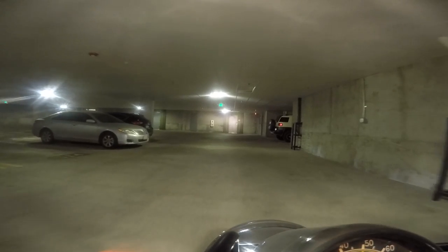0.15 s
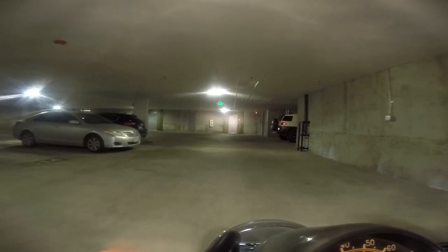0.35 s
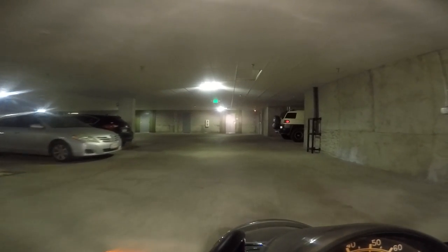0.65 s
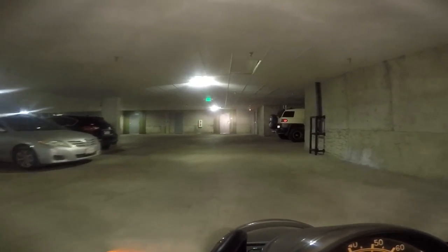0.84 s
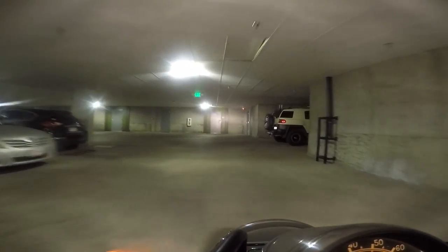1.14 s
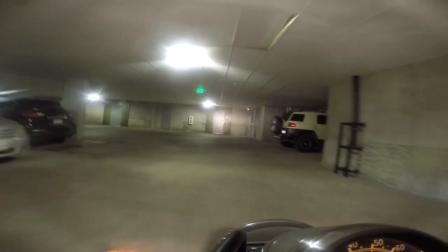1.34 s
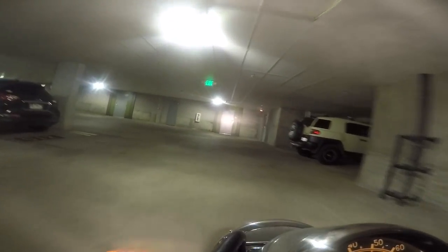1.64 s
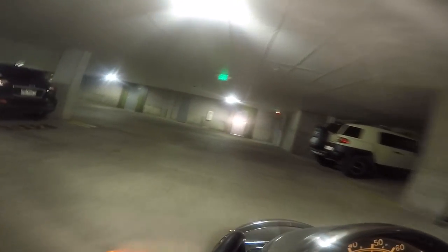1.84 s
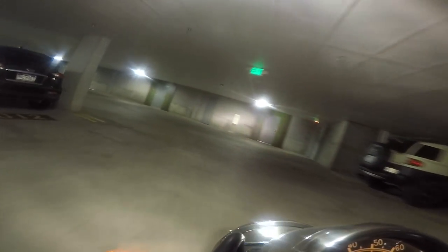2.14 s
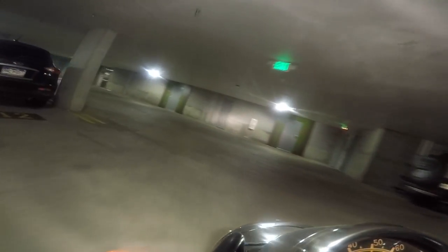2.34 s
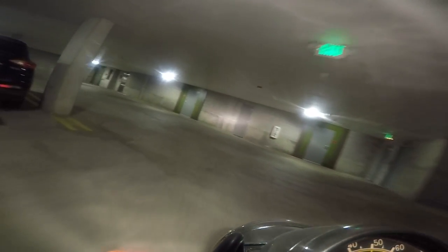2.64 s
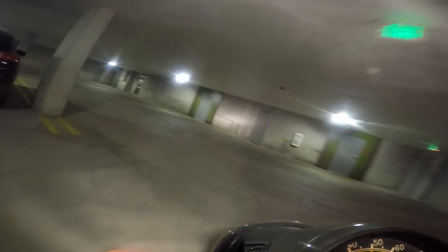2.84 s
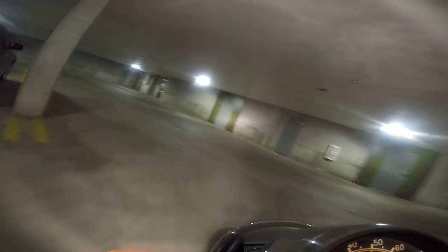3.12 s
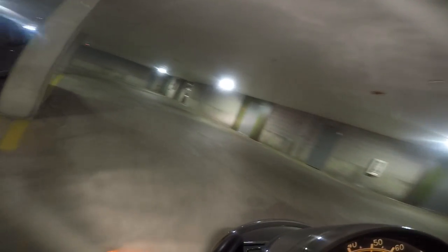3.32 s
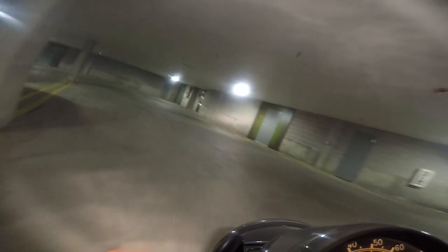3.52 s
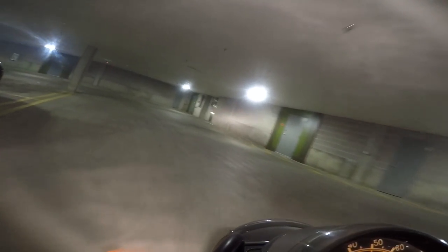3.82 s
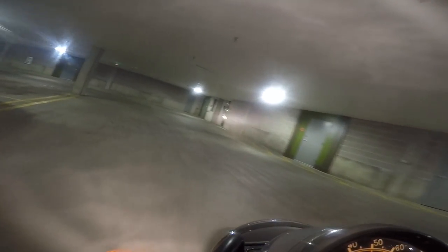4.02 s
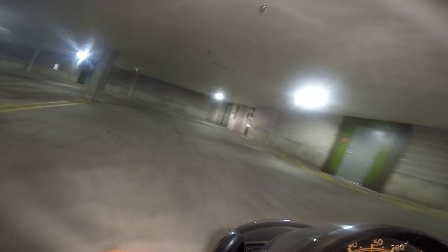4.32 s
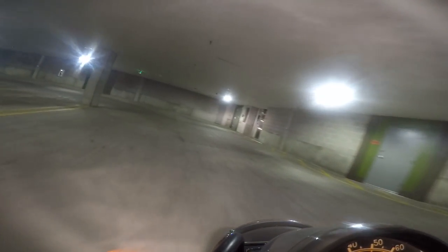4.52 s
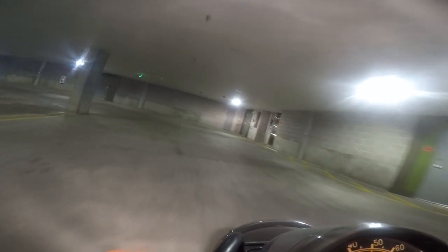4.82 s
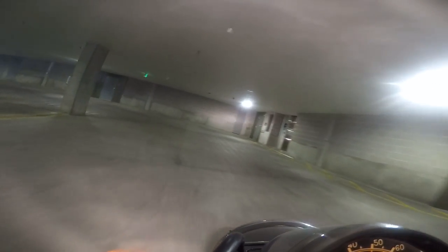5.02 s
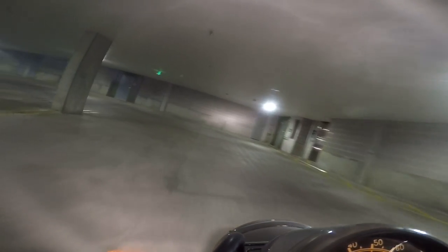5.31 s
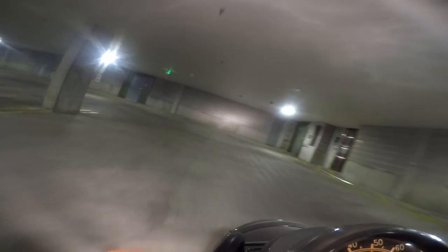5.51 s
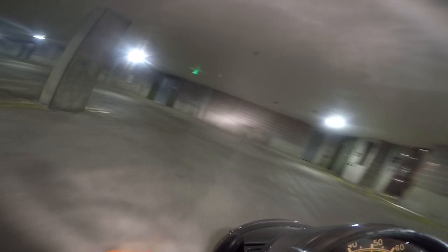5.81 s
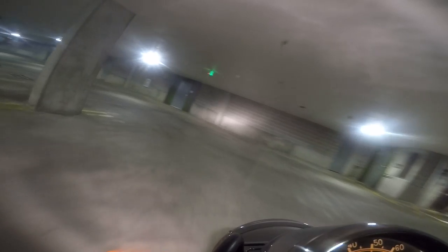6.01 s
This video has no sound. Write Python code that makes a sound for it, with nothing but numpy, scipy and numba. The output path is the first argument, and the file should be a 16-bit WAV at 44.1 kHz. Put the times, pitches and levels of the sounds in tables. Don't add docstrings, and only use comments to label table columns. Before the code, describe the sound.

A heavy, buzzing engine drone fills a reverberant underground garage as a motorcycle creeps along. Sharp plastic ticks and dull case thumps strike at once and return in uneven clusters, easing somewhat after four seconds. Gear whine grows clearer near five seconds, with two tiny chirps late on. The microphone is fixed to the vibrating bike, close, slightly overloaded and pumping.

```python
import sys
import numpy as np
from scipy import signal
from scipy.fft import rfft, irfft
from scipy.io import wavfile
from scipy.ndimage import uniform_filter1d
from numba import njit

SR = 44100
rng = np.random.default_rng(int(sys.argv[2]) if len(sys.argv) > 2 else 0)


def master_out(mix):
    frames = np.transpose(np.atleast_2d(mix))
    ceiling = np.clip(frames, -1, 1)
    pcm = np.round(ceiling * 32767).astype(np.int16)
    wavfile.write(sys.argv[1], SR, pcm)


def boost_factor(decibels):
    exponent = np.asarray(decibels, float) / 20
    return 10 ** exponent


N = 271656

# t/s, level/dB
SQUEAKS = [
    (4.955, -38.5),
    (4.967, -37),
    (5.829, -38),
    (5.834, -37),
]
# start t/s, end t/s, level/dB
GEAR_LOAD = [(-.1, .6, -39), (.6, .9, -41), (1.2, 1.55, -43), (4.55, 4.8, -40), (4.8, 5.14, -35),
             (5.14, 5.24, -39), (5.24, 5.78, -35), (5.78, 5.9, -41), (5.9, 6.3, -39.5)]
# f/Hz, level/dB
CLATTER_COLOUR = [(120, -28.5), (200, -16.5), (332, -13), (500, -7), (640, -15.5), (889, -15.5),
                  (1140, -14), (1320, -22.5), (2090, -27.5), (3140, -34.5), (5950, -37), (8900, -47.5),
                  (10600, -58.5), (15000, -71)]
# t/s, level/dB
CLATTER_LOAD = [(0.0, -45), (0.809, -45), (1.11, -43.5), (2.2, -42.5), (2.33, -43.5), (3.12, -43.5),
                (3.33, -45), (4.6, -44), (5.08, -42.5), (5.59, -44), (6.16, -41.5)]
# t/s, tick level/dB, blow level/dB
KNOCKS = [(.0095, -28.5, -11), (0.2975, -28.5, -10.5), (1.3806, -30.5, -11.5), (1.595, -28.5, -12),
          (1.8783, -28.5, -12.5), (1.909, -30.5, -11), (2.0603, -33, -12.5), (2.204, -29.5, -13.5),
          (2.31, -30.5, -10.5), (2.3277, -28.5, -9), (2.4126, -25.5, -8), (2.7847, -31.5, -17),
          (2.7917, -29, -11), (2.9073, -27.5, -9), (3.279, -34, -14), (3.332, -25, -10),
          (3.3443, -33.5, -12.5), (3.4238, -30.5, -12.5), (3.4663, -29.5, -10.5), (3.8543, -26, -10),
          (3.9483, -30, -13), (4.0596, -29, -12), (4.1413, -32.5, -14.5), (4.1931, -29.5, -10),
          (4.2232, -27, -9.5), (5.0311, -32.5, -14.5), (5.5518, -25.5, -8.5), (5.8795, -28.5, -11.5),
          (5.9488, -30, -13), (6.146, -24, -8.5)]
# t/s, tick level/dB, blow level/dB
TAPS = [(0.0316, -38.5, -15.5), (.0978, -39.5, -14.5), (0.1204, -39, -17.5), (0.3851, -33.5, -13),
        (0.5599, -39.5, -18.5), (.646, -39, -16), (1.1228, -34, -14), (1.3127, -35, -16.5),
        (2.2145, -33, -10.5), (2.2426, -32, -12), (2.2856, -31.5, -15.5), (2.2974, -33.5, -15),
        (2.3952, -32.5, -11.5), (2.5172, -34, -13.5), (2.8038, -34, -12.5), (3.177, -32, -16.5),
        (3.4956, -33, -13), (3.5093, -29.5, -10.5), (4.2845, -37, -15.5), (4.466, -34.5, -15.5),
        (4.63, -35.5, -14.5), (4.7095, -35, -15), (5.0948, -35.5, -15), (5.1114, -34, -16),
        (5.1347, -37, -13.5), (5.2329, -39, -14.5), (5.433, -38, -14), (5.5338, -35.5, -17.5),
        (5.6305, -35.5, -13), (6.0269, -37, -13)]
# start t/s, end t/s, tick level/dB
ROUGH_FLOOR = [(.04, .06, -41.5), (.2, .37, -49), (1.28, 1.3, -47), (1.64, 1.71, -42), (1.715, 1.75, -34.5),
               (1.79, 1.82, -35), (1.86, 1.875, -39.5), (1.94, 2.025, -37.5), (2.07, 2.19, -52),
               (2.417, 2.43, -39.5), (2.46, 2.71, -39.5), (2.86, 3.08, -39.5), (3.13, 3.2, -35.5),
               (3.23, 3.42, -42), (3.52, 3.535, -32), (3.57, 3.655, -37.5), (3.95, 3.99, -39.5),
               (4.2, 4.215, -31), (4.32, 4.45, -47.5), (4.715, 4.73, -37.5), (4.78, 4.8, -39),
               (5.01, 5.02, -43), (5.2, 5.225, -40.5), (5.6, 5.66, -42.5), (5.84, 6.14, -45.5)]
# place in the cycle [0-1], level/dB
SWINGS = [
    (.11, -1),
    (.39, -4),
    (.67, 1),
]
# f/Hz, t60/s, level/dB, crest delay/s
CASE_MODES = [(117.2, 0.03, -1.5, 0.0044), (162.7, 0.089, -9, 0.0036), (256.5, 0.032, -3, 0.0024),
              (405, 0.013, -1.5, 0.0024), (773, 0.019, -9.5, .0013), (878.4, 0.042, -6.5, .0012),
              (2045, 0.019, -9, 0.0006)]
# f/Hz, t60/s, level/dB, crest delay/s
TICK_MODES = [(2694, 0.028, -5, 0.00037), (3636, 0.029, -5.5, 0.00031), (4750, 0.0029, -6, 0.00033),
              (5640, 0.023, -3.5, 0.0023), (5980, 0.019, 1.5, .0003), (7600, 0.012, -4, 0.000077),
              (8750, 0.011, -7, 0.00018), (10344, 0.0036, -24, .0004), (12300, .003, -26, .0004),
              (14500, .003, -28, .0004)]
# f/Hz, width/Hz, level/dB
PIPE_MODES = [(174.3, 122, 3), (341, 45, 0.5), (464.4, 175, -2), (506.05, 101, -2), (885, 270, -16),
              (1137, 135, -12), (1582, 120, -21.5), (2132, 53, -20.5)]
# t/s, cycle rate f/Hz
SPEED = [(0, 22.742), (1.3, 23.273), (1.6, 23.544), (2.6, 24.214), (3.3, 24.218), (4.7, 24.691),
         (6.16, 25.431)]
# place in the cycle [0-1], level/dB
BEATS = [
    (.13, -1.5),
    (.42, -5.5),
    (.67, -4),
    (0.923, -5),
]
# multiple of the cycle rate, sign, start level/dB, end level/dB
STRONG_ORDERS = [(2, -1, -16.5, -15), (3, -1, -19.5, -15.5), (4, 1, -18.5, -27.5), (5, -1, -17, -14),
                 (7, -1, -19, -19)]
# multiple of the cycle rate, level/dB
WEAK_ORDERS = [(2.5, -29), (3.5, -25.5), (6, -27.5), (6.5, -33.5), (7.5, -31.5), (8, -34), (9, -31),
               (10, -37.5), (12, -33.5), (14, -35)]
# t/s, order, level change/dB, length/s
ORDER_DIPS = [(.35, 2, 0.5, 0.07), (0.694, 2, -0.5, .1), (2.394, 2, 0, .15), (3.643, 2, -4.5, .15),
              (4.152, 2, 2, 0.12), (5.847, 2, -3.5, .12), (.5, 3, -7, 0.17), (2.043, 3, -3, 0.27),
              (2.81, 3, -5, 0.071), (3.75, 3, -3, .15), (4.247, 3, -3.5, 0.068), (4.756, 3, -5.5, .1),
              (5.248, 3, -6, 0.091), (5.847, 3, -8.5, .12), (2.084, 4, -12.5, .1), (4.221, 4, -8.5, 0.11),
              (0.297, 5, -1, 0.44), (1.703, 5, -18, 0.21), (2.997, 5, -14, 0.12), (3.504, 5, -9.5, .2),
              (4.195, 5, -12, 0.15), (4.832, 5, -8.5, 0.11), (5.6, 5, -3.5, 0.097), (.9, 7, -17.5, 0.47),
              (1.485, 7, -7.5, .08), (2.398, 7, -7.5, 0.039), (2.773, 7, -17.5, 0.066),
              (3.889, 7, -7.5, .35), (4.92, 7, -3.5, 0.12), (5.518, 7, -10.5, 0.11)]

START_TURNS = .884
GARAGE_T60_S = 2.67
TEETH = 46.2
WHINE_SLACK_DB, WHINE_FADE_S = -56, .08
CHATTER_DB, CHATTER_SCATTER_DB, RATTLE_SCATTER_DB, SWING_JITTER_S = -58, 3.5, 1.5, .0008
BLOW_DB, BLOW_PER_TICK, BLOW_SCATTER_DB = -13, 0.79, 2
TICK_LAG_S = .0004
DUCK_ATTACK_S, DUCK_RELEASE_S, DUCK_FROM, DUCK_SHARE = 0.0009, 0.054, .55, 0.66
TOP_HZ = 15300


def level(x, db):
    return x * boost_factor(db) / np.sqrt(np.mean(x ** 2))


def curve(s, values):
    return np.interp(np.arange(N) / SR, s, values)


def walk(rate):
    hold = int(SR / rate)
    steps = np.repeat(rng.standard_normal(N // hold + 1), hold)
    return 1.2 * uniform_filter1d(uniform_filter1d(steps, hold), hold)[:N]


def band(x, hz, width):
    return signal.lfilter(*signal.iirpeak(hz, hz / width, fs=SR), x)


def ring(x, modes):
    t = np.arange(int(.08 * SR)) / SR
    response = 0
    for hz, t60, db, crest in modes:
        rise = np.sin(np.pi / 2 * np.clip((t + 0.0012) / (crest + 0.0013), 0, 1)) ** 2
        decay = np.exp(-np.log(1000) * np.maximum(t - crest, 0) / t60)
        response = response + boost_factor(db) * rise * decay * np.cos(2 * np.pi * hz * (t - crest))
    return signal.oaconvolve(x, response)[:N]


def rumble():
    sway = signal.sosfilt(signal.butter(2, 30, fs=SR, output="sos"), rng.standard_normal(N))
    shake = band(band(rng.standard_normal(N), 177, 27), 177, 27)
    return level(sway, -31.5) + level(shake, -29.0)


def garage(x):
    t = np.arange(int(GARAGE_T60_S * SR)) / SR
    decay = np.exp(-np.log(1000) * t / GARAGE_T60_S)
    tail = rng.standard_normal(len(t)) * decay * (t > .012)
    return signal.fftconvolve(x, tail / np.sqrt(np.sum(tail ** 2)))[:N]


def squeaks():
    s, db = np.transpose(SQUEAKS)
    hits = np.zeros(N)
    hits[(s * SR).astype(int)] = boost_factor(db)
    return ring(hits, [(4300, .02, 0, .002)])


def whine(turns):
    t = np.arange(N) / SR
    db = np.full(N, 1. * WHINE_SLACK_DB)
    for start, end, load_db in GEAR_LOAD:
        db[(t > start) & (t < end)] = load_db
    db = uniform_filter1d(db, int(WHINE_FADE_S * SR)) + 2.2 * walk(30)
    wobble = .06 * walk(50) + .3 * walk(10) + .04 * np.sin(2 * np.pi * turns)
    return np.sqrt(2) * boost_factor(db + 4.5) * np.sin(2 * np.pi * (TEETH * turns + wobble))


def clatter(pulses):
    out, swell = 0, walk(9)
    throb = signal.lfilter([1], [1, -np.exp(-1 / (0.021 * SR))], pulses)
    throb = uniform_filter1d(throb, size=90)
    hz, db = np.transpose(CLATTER_COLOUR)
    f = np.fft.rfftfreq(N, 1 / SR) + 1
    colour = boost_factor(np.interp(np.log(f), np.log(hz), db))
    for octave in np.arange(7, 14.1, .5):
        share = np.cos(np.pi * np.clip(np.log2(f) - octave, -.5, .5))
        noise = irfft(rfft(rng.standard_normal(N)) * colour * share, N)
        flicker = boost_factor(0.62 * swell + 0.77 * walk(24.95))
        out = out + noise * flicker * (1 + 0.043 * throb)
    s, load_db = np.transpose(CLATTER_LOAD)
    return level(out, 17.36) * boost_factor(curve(s, load_db))


def chatter(turns):
    rows = []
    listed = np.array([row[0] for row in KNOCKS + TAPS])
    for place, db in SWINGS:
        s = np.flatnonzero(np.diff(np.floor(turns - place))) / SR
        strength, jitter = rng.standard_normal((len(s), 2)).T
        tick_db = CHATTER_DB + CHATTER_SCATTER_DB * strength
        for start, end, rough_db in ROUGH_FLOOR:
            rough = (s > start) & (s < end)
            tick_db = np.where(rough, rough_db + RATTLE_SCATTER_DB * strength, tick_db)
        free = np.abs(s[:, None] - listed).min(axis=1) > .007
        tick_db = np.where(free, tick_db + db, -90)
        rows += zip(np.clip(s + SWING_JITTER_S * jitter, 0, N / SR - .002), tick_db)
    return rows


def detuned(modes, ratio):
    return [(hz * ratio, *rest) for hz, *rest in modes]


def knocks(turns):
    light = np.array(chatter(turns))
    scatter_db = BLOW_SCATTER_DB * rng.standard_normal(len(light))
    light_blow_db = BLOW_DB + BLOW_PER_TICK * (light[:, 1] + 32) + scatter_db
    s, tick_db, blow_db = np.vstack([KNOCKS, TAPS, np.column_stack([light, light_blow_db])]).T
    at = ((s + .0008) * SR).astype(int)
    late = at + int(TICK_LAG_S * SR)
    spot = rng.random(len(s)) * 3 // 1
    push = np.hanning(int(0.00073 * SR))
    push = push / push.sum()
    out = 0
    for k, detune in enumerate((.95, 1.0, 1.05)):
        here = spot == k
        blow, tick, snap = np.zeros((3, N))
        blow[at] = here * boost_factor(blow_db + 7.5)
        tick[late] = here * boost_factor(tick_db + 1)
        snap[late] = here * boost_factor(1.4 * (tick_db + 32.0) - 33.5)
        out = out + ring(np.convolve(blow, push, "same"), detuned(CASE_MODES, detune))
        out = out + ring(tick, detuned(TICK_MODES[:5], detune ** .4))
        out = out + ring(snap, detuned(TICK_MODES[5:], detune))
    return out


def beats(turns):
    pulses = np.zeros(N)
    for place, db in BEATS:
        at = np.flatnonzero(np.diff(np.floor(turns - place)))
        jitter, strength = rng.standard_normal((len(at), 2)).T
        at = np.clip(at + (.001 * SR * jitter).astype(int), 0, N - 1)
        pulses[at] = boost_factor(db + 3.508 * strength)
    return pulses


def exhaust(pulses):
    out = 0
    for k, (hz, width, db) in enumerate(PIPE_MODES):
        mode = band(band(pulses, hz, 0.89 * width), hz, 0.89 * width)
        out = out + (-1) ** k * boost_factor(db) * mode
    return level(out, -26.5)


def order_levels():
    t = np.arange(N) / SR
    out = []
    for order, sign, first_db, last_db in STRONG_ORDERS:
        db = first_db + (last_db - first_db) * t / t[-1]
        for s, spot_order, depth_db, length in ORDER_DIPS:
            if round(spot_order) == round(order):
                db = db + depth_db * np.exp(-((t - s) / length) ** 2)
        out.append((round(order), np.sign(sign), db))
    return out


def boom(turns, main):
    out = 0
    for order, sign, db in main:
        waver = (order - 1) / 5
        strength = boost_factor(db + 1.0 * waver * walk(14))
        phase = order * turns + .05 * waver * walk(12)
        out = out + sign * strength * np.cos(2 * np.pi * phase)
    for order, db in WEAK_ORDERS:
        strength = boost_factor(db + 3.73 * walk(14))
        phase = order * turns + rng.random() + 0.17 * walk(12)
        out = out + strength * np.sin(2 * np.pi * phase)
    return np.sqrt(2) * out


def scene():
    turns = np.cumsum(curve(*np.transpose(SPEED))) / SR + START_TURNS
    pulses = beats(turns)
    pipe = exhaust(pulses)
    camera = rumble() + knocks(turns)
    machinery = squeaks() + whine(turns) + clatter(pulses)
    engine = boom(turns, order_levels()) + pipe + boost_factor(2.5) * garage(pipe)
    return (camera + machinery + engine)[None]


@njit
def duck(x, attack, release):
    e, out = 0., np.empty(len(x))
    for i in range(len(x)):
        e += (abs(x[i]) - e) * (attack if abs(x[i]) > e else release)
        out[i] = e
    return out


def band_limit(x):
    return signal.sosfilt(signal.butter(12, 15200, fs=SR, output="sos"), x)


def record(dry):
    x = dry[0] * boost_factor(0.5)
    peak = duck(x, 1 / (DUCK_ATTACK_S * SR), 1 / (DUCK_RELEASE_S * SR))
    x = x * np.minimum(1, DUCK_FROM / (peak + 1e-9)) ** DUCK_SHARE
    ceiling = np.where(x > 0, 1.05, .74)
    x = x / (1 + (x / ceiling) ** 4) ** .25
    x = x - x.mean() - .005
    x = signal.sosfilt(signal.ellip(8, .3, 70, TOP_HZ, fs=SR, output="sos"), x)
    return band_limit(x[None])


dry = scene()
out = record(dry)
master_out(out)
```